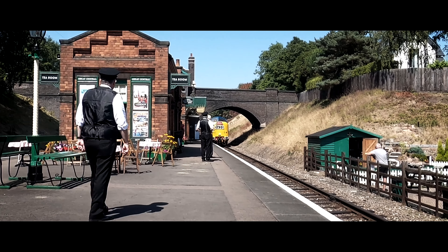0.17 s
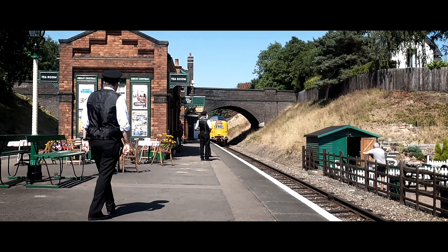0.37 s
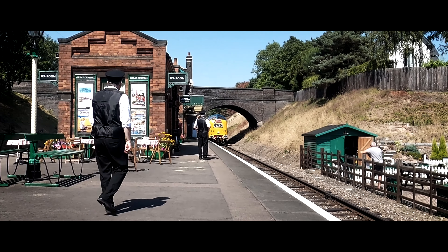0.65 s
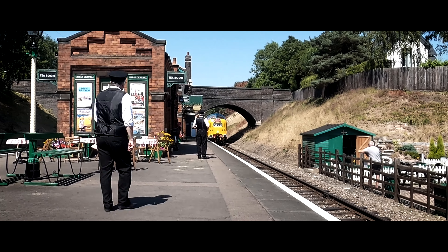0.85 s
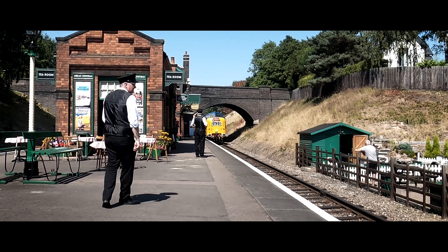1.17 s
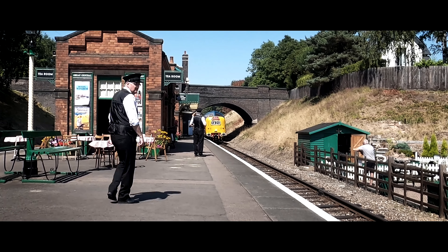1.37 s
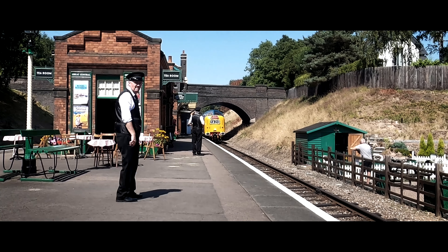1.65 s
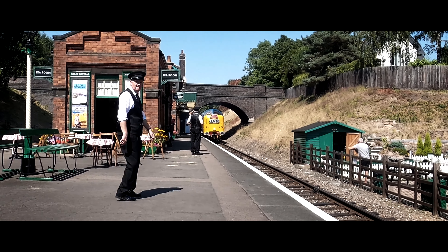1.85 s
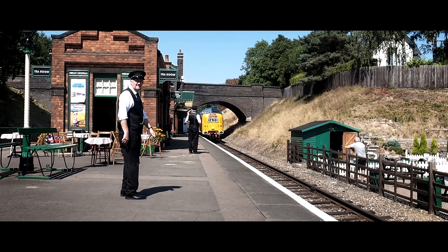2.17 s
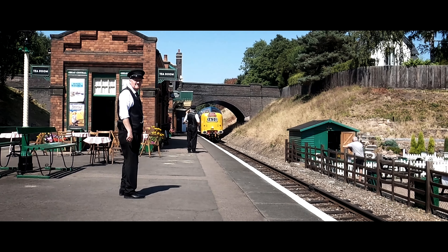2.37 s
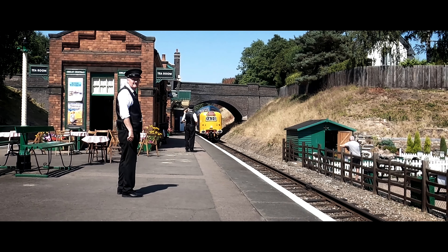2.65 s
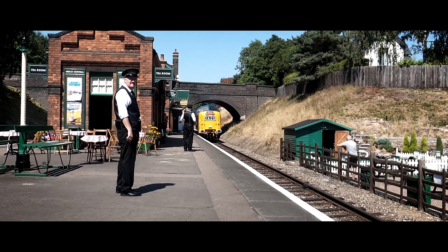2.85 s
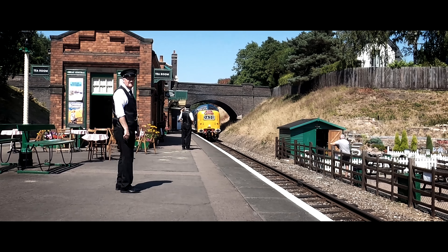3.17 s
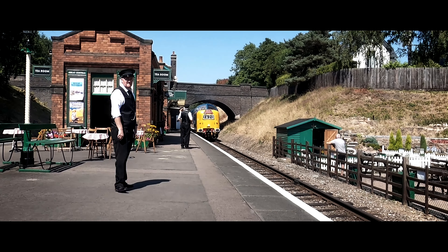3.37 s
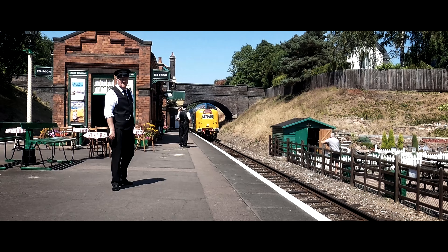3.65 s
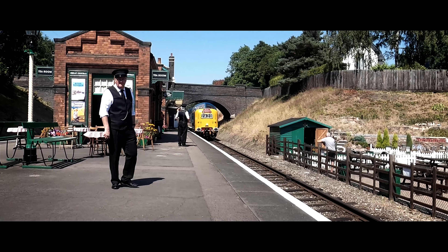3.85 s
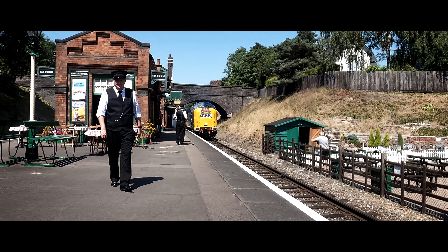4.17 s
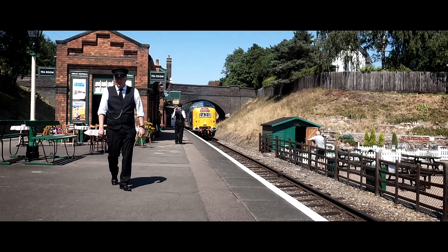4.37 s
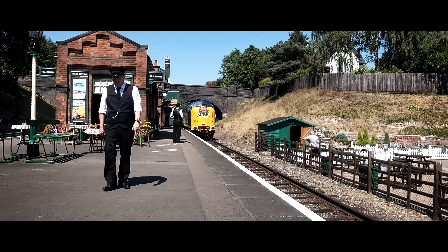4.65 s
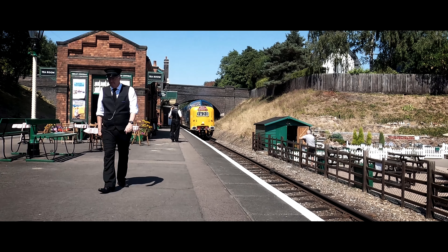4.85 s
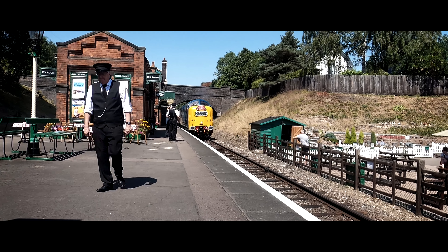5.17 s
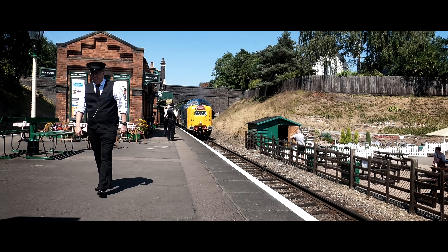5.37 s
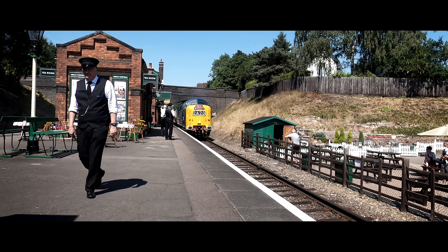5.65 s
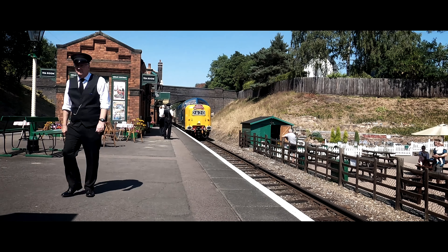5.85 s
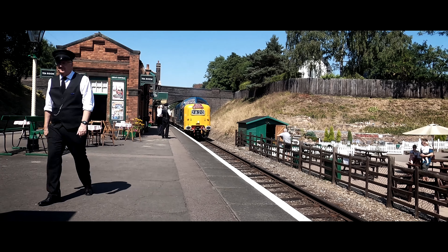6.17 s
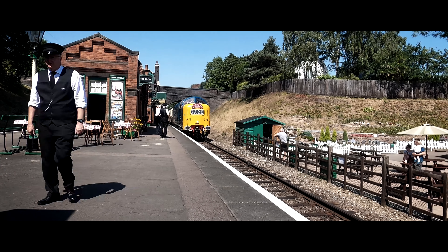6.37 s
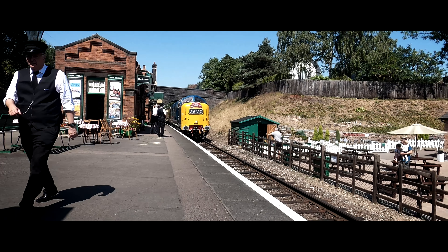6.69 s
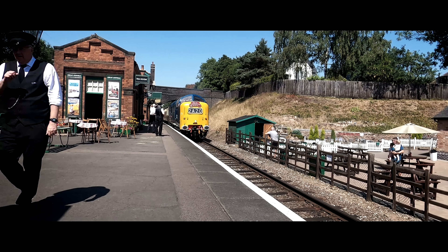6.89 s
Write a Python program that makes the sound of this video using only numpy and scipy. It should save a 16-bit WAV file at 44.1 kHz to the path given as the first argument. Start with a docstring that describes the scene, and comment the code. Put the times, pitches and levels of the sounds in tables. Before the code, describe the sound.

The low, pulsing drone of an approaching diesel train swells steadily, joined late by a short metal squeak and clanking wheels.

```python
"""A twin-engined diesel locomotive rolls under a bridge towards a stereo pair on a country platform.
It closes from 95 m to about 35 m. The engines idle at slightly different speeds, so their exhaust
notes beat; echoes in the cutting make them swell and fade. Machinery roars behind the drone, loudest
under the arch, and wheels clank over a rail joint. Around the microphones shoes tick on grit,
something clicks, dry metal squeaks once and leaves rustle faintly."""
import sys
import numpy as np
from scipy import signal
from scipy.fft import rfft, irfft
from scipy.io import wavfile
from scipy.ndimage import uniform_filter1d

SR = 44100
rng = np.random.default_rng(int(sys.argv[2]) if len(sys.argv) > 2 else 0)


def to_wav(s):
    """Save 16-bit WAV."""
    ch = np.atleast_2d(s).T  # columns
    pcm = np.round(np.clip(ch, -1, 1) * 32767)  # PCM
    wavfile.write(sys.argv[1], SR, pcm.astype(np.int16))


N = 309624
TIME = np.arange(N) / SR
FREQ = np.maximum(np.arange(N // 2 + 1) * SR / N, 1)
ARCH_S, ARCH_WIDTH_S = 2.57, 0.54  # the bridge arch throws the sound forward to the platform

# Dull noise of exhaust gas and wheel thuds. Each row: frequency in Hz, level in dB.
DULL_COLOUR = [(90, -29), (140, -2.5), (190, 2.5), (240, -1), (275, -9), (310, -15.5), (500, -28.5),
               (1000, -60.5)]


def exhaust_beat(first_turns, second_turns):
    """Each engine sounds a boom and a higher drone; the two booms beat about three times a second."""
    # First engine's boom, second's boom, first's drone. Each row: time in seconds, level in dB.
    first_boom = [(0.0, -14.9), (1.0, -12.5), (1.3, -17.5), (1.9, -29.5), (2.3, -20.5), (2.75, -14.6),
                  (3.0, -17.5), (3.2, -11.5), (4.0, -10.5), (4.6, -21.1), (4.8, -11), (5.7, -10.5),
                  (6.3, -7), (7.0, -7.8)]
    second_boom = [(0.0, -34.5), (1.0, -25.5), (1.65, -16.0), (2.7, -30.5), (4.0, -25), (5.2, -19.5),
                   (6.5, -31.5), (7.0, -28.5)]
    first_drone = [(0.0, -31), (0.2, -35.5), (0.7, -29), (1.4, -27.5), (1.7, -36), (1.8, -26.0), (2.2, -18),
                   (3.1, -16.5), (3.2, -24.5), (4.5, -17.5), (5.1, -27.0), (5.3, -19.5), (6.0, -17),
                   (6.1, -22.0), (6.3, -17.5), (7.0, -21)]
    boom = undb(curve(first_boom)) * note(first_turns, order=9)
    boom += undb(curve(second_boom)) * note(second_turns, order=9)
    drone = note(first_turns, order=19) + undb(-18) * note(second_turns, order=19)
    return boom + undb(curve(first_drone)) * drone


def exhaust_bass(turns, rumble_db=-24, fall_db_per_s=1.25):
    """Unequal cylinders add low notes over a deep rumble that slowly fades."""
    # The low notes. Each row: cycles a crankshaft turn, relative level in dB.
    orders = [(2, -18), (3, -9), (4, -12.5), (5, -16), (6, -3), (7, -8), (8, -3.5), (10, -1.5), (11, -17)]
    # Their joint rise and fall. Each row: time in seconds, relative level in dB.
    levels = [(0.0, -30.5), (0.8, -24.5), (1.4, -31.5), (1.6, -25.0), (2.7, -30.0), (3.4, -30.0),
              (4.7, -22.0), (6.4, -32), (7.0, -25.0)]
    # The rumble. Each row: frequency in Hz, level in dB.
    rumble_colour = [(10, -23), (24, 4.5), (36, 0.5), (55, 4), (90, 0), (125, -1.5), (160, -4), (300, -48)]
    notes = undb(curve(levels) + 1) * echoed_notes(turns, orders, echo=0.23)
    rumble = undb(rumble_db - fall_db_per_s * TIME) * noise(colour(rumble_colour))
    return notes + rumble


def exhaust_body(turns, nearer_db):
    """Middle harmonics and rushing gas grow with the approach and swell under the arch."""
    # The middle notes. Each row: cycles a crankshaft turn, relative level in dB.
    orders = [(14, -16), (15, -8), (16, -7.5), (17, -7), (18, -13.5), (21, -9), (22, -16.5), (24, -21),
              (27, -27.5), (28, -19.5)]
    level_db = -31 + nearer_db + 4 * swell(ARCH_S, ARCH_WIDTH_S)
    notes = echoed_notes(turns, orders, echo=0.44)
    gas = undb(-1.5) * noise(colour(DULL_COLOUR))
    return undb(level_db) * (notes + gas)


def exhaust_rasp(turns, nearer_db, darken_db_per_s=0.58):
    """The highest harmonics in turbulent gas: they darken as they near and briefly turn gruffer."""
    # The high notes. Each row: cycles a crankshaft turn, relative level in dB.
    orders = [(30, -14), (34, -9), (36, -15), (37, -16.5), (42, -13.5), (45, -15.5), (46, -15)]
    # The gas around them. Each row: frequency in Hz, level in dB.
    gas_colour = [(200, -19.5), (320, -4.5), (440, 2.5), (550, -1.5), (640, -15.5), (1200, -34.5)]
    gruff_db = 6 * swell(at_s=4.79, width_s=0.28)
    level_db = -38 + 0.27 * nearer_db + 4 * swell(ARCH_S, width_s=0.9) + gruff_db
    tilt_db = darken_db_per_s * (TIME - TIME.mean())
    lower = undb(tilt_db) * echoed_notes(turns, orders[:4], echo=0.86)
    upper = undb(-tilt_db) * echoed_notes(turns, orders[4:], echo=0.86)
    gas = undb(-2.5) * stereo_noise(colour(gas_colour))
    return undb(level_db) * (lower + upper + gas)


def echoed_notes(turns, orders, echo):
    """Crankshaft harmonics; each meets its own shifting echo from the cutting at the microphones."""
    notes = 0
    for order, db in orders:
        direct = np.exp(2j * np.pi * rng.random())
        reflected = echo * (walk(1.6) + 1j * walk(1.6))
        tone = np.real((direct + reflected) * np.exp(2j * np.pi * order * turns))
        notes += undb(db) * unit(tone)
    return notes


def machinery(turns):
    """Blowers, gears and wheels: a wavering roar that throbs with the firings, dulled by distance."""
    # The roar, then the treble the air soaks up. Each row: frequency in Hz, gain in dB.
    roar_colour = [(300, -14), (620, -1), (1000, 0.5), (1400, -5), (1800, -6), (2500, -12), (4000, -18.5),
                   (6000, -27), (8000, -38.5), (11000, -40.5)]
    air_loss = [(9000, 0), (12000, -6), (15000, -18)]
    # Running-gear resonances. Each row: frequency in Hz, width in Hz, relative level in dB.
    gear_modes = [(933.4, 40, -16), (1068, 69, -13), (1308, 20, -16.5), (1593, 79, -20)]
    level_db = -36 + 3.5 * swell(ARCH_S, ARCH_WIDTH_S)
    throb = 1 + 0.033 * note(turns, order=9) + 0.022 * note(turns, order=2)
    roar = stereo_noise(colour(roar_colour) * colour(air_loss)) * throb * undb(1 + 0.5 * walk(12))
    gears = sum(undb(db + 2 * walk(3.7)) * noise(band(hz, width)) for hz, width, db in gear_modes)
    return undb(level_db) * (roar + gears)


def rail_joint(rise_s=0.006):
    """Wheel blows ring the steel, with a gritty crack and a thud; the rail sings on after each."""
    # The blows. Each row: start in seconds, relative level in dB.
    clanks = [(6.056, -26), (6.11, -34), (6.457, -34), (6.524, -40)]
    # The wheel's resonances. Each row: frequency in Hz, width in Hz, level in dB.
    wheel_modes = [(545, 54, -4), (969, 60, -1), (1580, 32, 5), (1820, 90, -11), (2200, 200, -9)]
    strikes = np.zeros(N)
    for start, db in clanks:
        strikes[int(start * SR)] = undb(db)
    wheel = resonances(wheel_modes)
    ring = shape(strikes, wheel / np.abs(irfft(wheel, N)).max())
    grit = stereo_noise(colour([(300, 5), (1000, 6), (2200, 6), (5000, -4.5), (9000, -19.5)]))
    crack = grit * sum(undb(db) * burst(start, rise_s, decay_s=0.041) for start, db in clanks)
    dull = noise(colour(DULL_COLOUR))
    thud = dull * sum(undb(db) * burst(start, rise_s, decay_s=0.066) for start, db in clanks)
    rail = noise(band(hz=1020, width_hz=200))
    singing = rail * np.max([burst(start, rise_s, decay_s=0.45) for start, _ in clanks], axis=0)
    return undb(7.5) * ring + undb(-7) * crack + undb(4) * thud + undb(-41) * singing


def squeak(start_s=5.29, jump_s=5.59, slide_s=5.645, stop_s=5.73, low_hz=2890, high_hz=3480):
    """Dry metal sticks and slips: a broken whistle jumps up, holds and slides off over a fading rasp."""
    # The rubbed metal's resonances. Each row: frequency in Hz, width in Hz, level in dB.
    metal_modes = [(1850, 700, 6), (3000, 600, 2), (4300, 900, 0), (6100, 900, -6), (6950, 800, -1),
                   (7800, 600, -3)]
    attack_s, release_s, sag_hz_per_s = 0.062, 0.026, 11000
    sliding_hz = high_hz - sag_hz_per_s * np.maximum(TIME - slide_s, 0)
    hz = np.where(TIME < jump_s, low_hz, np.maximum(sliding_hz, low_hz))
    pressure = np.clip(np.minimum((TIME - start_s) / attack_s, (stop_s - TIME) / release_s), 0, 1)
    cycles = np.cumsum(hz * (1 + 0.036 * walk(1500))) / SR
    grip = undb(3.5 * walk(150) - 6 - 3.5 * (TIME < jump_s))  # weaker before the jump
    whistle = grip * (note(cycles, order=1) + undb(-16) * note(cycles, order=2))
    rasp = stereo_noise(resonances(metal_modes)) * undb(1.5 + 2 * walk(50))
    rasp *= burst(start_s, rise_s=0.0092, decay_s=0.23)
    return undb(-37.5) * pressure * (whistle + rasp)


def click(start_s=0.3317, rise_s=0.001):
    """Something small and hard gives a bright crack and a short ring."""
    # Its resonances. Each row: frequency in Hz, width in Hz, level in dB.
    modes = [(2930, 150, 4), (5080, 150, 2), (6000, 150, -7)]
    bright = colour([(1500, -5), (4000, -3.5), (6200, 5), (9000, -9), (11000, -18)])
    crack = burst(start_s, rise_s, decay_s=0.0017) * stereo_noise(bright)
    ring = burst(start_s, rise_s, decay_s=0.012) * stereo_noise(resonances(modes))
    return undb(-21) * (crack + undb(-17) * ring)


def shoes():
    """Each tread or scuff crushes tiny stones on the asphalt; longer scuffs start more gently."""
    # Each row: start in seconds, level in dB, brightest frequency in Hz, decay in seconds.
    steps = [(1.18, -48, 10000, .002), (1.258, -47, 11000, 0.0081), (1.3, -54, 11000, .07),
             (1.437, -46, 10000, 0.0018), (1.695, -47, 5500, 0.027), (2.219, -42, 8000, .012),
             (4.286, -44, 9500, 0.0037), (4.307, -41, 9000, 0.0036), (4.98, -51.5, 7500, .048),
             (5.315, -41, 5500, 0.028), (5.5, -35.5, 11000, 0.023), (5.502, -38.5, 4480, 0.042),
             (5.593, -44, 10500, .012), (6.167, -35.5, 7000, 0.0062), (6.455, -42, 3500, .03),
             (6.772, -46, 8000, 0.0084), (6.89, -45, 4200, 0.11)]
    grit = stereo_noise(colour([(11000, 0), (13000, -4), (15000, -16)]))
    stones = unit(undb(4 * walk(1500)))
    treads = 0
    for start, db, hz, decay_s in steps:
        crunch = unit(shape(grit, band(hz, 0.7 * hz)))
        treads += undb(db) * burst(start, 0.32 * decay_s, decay_s) * crunch
    return treads * stones


def platform_rustle():
    """Grit and dry leaves stir faintly along the platform, in patches with a fine grain."""
    hiss = stereo_noise(colour([(2000, -15), (6000, 0), (10000, -5), (13000, -7), (15000, -14)]))
    return undb(-70 + 3 * walk(14) + 3 * walk(500)) * hiss


def stereo_noise(response):
    """Scattered paths make the treble differ between the two microphones."""
    # The pair's width. Each row: frequency in Hz, side against mid in dB.
    width = [(100, -28), (250, -21), (500, -15), (1000, -12), (2000, -8), (4000, -4), (8000, -3)]
    mid = noise(response)
    side = shape(noise(response), colour(width))
    return np.array([mid + side, mid - side])


def undb(db):
    """Decibels to gain."""
    return 10 ** (np.asarray(db) / 20)


def unit(x):
    """Scale to rms 1."""
    return x / np.sqrt(np.mean(x ** 2))


def curve(points):
    """Join (seconds, value) points with straight lines."""
    return np.interp(TIME, *np.transpose(points))


def swell(at_s, width_s):
    """A smooth rise and fall, 1 at its middle."""
    return np.exp(-0.5 * ((TIME - at_s) / width_s) ** 2)


def burst(start_s, rise_s, decay_s):
    """A straight rise, then an exponential fall."""
    age = TIME - start_s
    return np.clip(age / rise_s, 0, 1) * np.exp(-np.clip((age - rise_s) / decay_s, 0, 50))


def walk(rate_hz):
    """Random levels held for 1 / rate_hz seconds and smoothed twice; spread near 1."""
    hold = max(int(SR / rate_hz), 1)
    levels = np.repeat(rng.standard_normal(N // hold + 2), hold)
    return 1.3 * uniform_filter1d(uniform_filter1d(levels, hold), hold)[:N]


def note(turns, order):
    """A sine of rms 1 with `order` cycles a turn."""
    return np.sqrt(2) * np.sin(2 * np.pi * order * turns)


def colour(points):
    """Gain at every frequency from (Hz, dB) points; above the last it falls 12 dB an octave."""
    hz, db = np.transpose(points)
    return undb(np.interp(np.log(FREQ), np.log(hz), db)) * np.minimum(hz[-1] / FREQ, 1) ** 2


def band(hz, width_hz):
    """Steep response of two like resonators in a row."""
    return 1 / (1 + 1j * (FREQ ** 2 - hz ** 2) / (FREQ * width_hz)) ** 2


def resonances(modes):
    """Summed response of (Hz, width in Hz, dB) bands."""
    return sum(undb(db) * band(hz, width) for hz, width, db in modes)


def shape(x, response):
    """Filter by a frequency response."""
    return irfft(rfft(x) * response, N)


def noise(response):
    """Noise of rms 1 in the given colour."""
    return unit(shape(rng.standard_normal(N), response))


def scene(start_m=95, pace_m_per_s=8.6, second_rev_per_s=11.814):
    """From the platform: the locomotive closing at an even pace, and the small sounds around it."""
    # The first engine's crankshaft. Each row: time in seconds, speed in turns a second.
    crank_speed = [(0.0, 12.115), (1.0, 12.119), (1.5, 12.147), (2.0, 12.232), (2.5, 12.203), (3.7, 12.089),
                   (4.5, 12.204), (5.5, 12.1), (7.0, 12.201)]
    turns = np.cumsum(curve(crank_speed)) / SR
    nearer_db = 20 * np.log10(start_m / (start_m - pace_m_per_s * TIME))
    exhaust = exhaust_beat(turns, second_rev_per_s * TIME) + exhaust_bass(turns)
    exhaust = exhaust + exhaust_body(turns, nearer_db) + exhaust_rasp(turns, nearer_db)
    return exhaust + machinery(turns) + platform_rustle() + shoes() + click() + rail_joint() + squeak()


def record(dry, lean_db=0.79, shade=0.55, lag_samples=2, top_hz=15400):
    """The right microphone faces the track: earlier, louder, brighter. Peaks are rounded, the top cut."""
    left, right = dry
    treble = signal.sosfilt(signal.butter(1, [4500, 11000], "band", fs=SR, output="sos"), left)
    left = np.pad(left - shade * treble, (lag_samples, 0), mode="edge")[:N]
    pair = np.array([left * undb(-lean_db), right * undb(lean_db)])
    rounded = pair / (1 + pair ** 16) ** (1 / 16)
    return signal.sosfilt(signal.ellip(8, 0.2, 70, top_hz, fs=SR, output="sos"), rounded)


dry = scene()
out = record(dry)
to_wav(out)
```